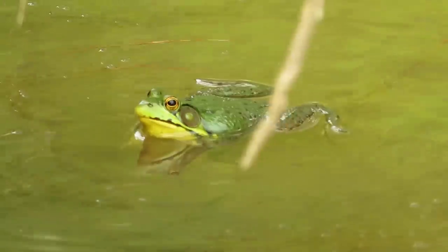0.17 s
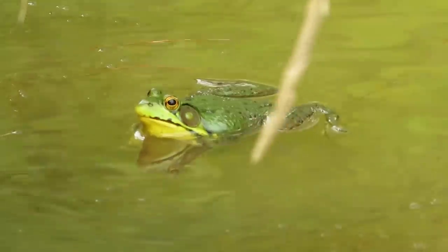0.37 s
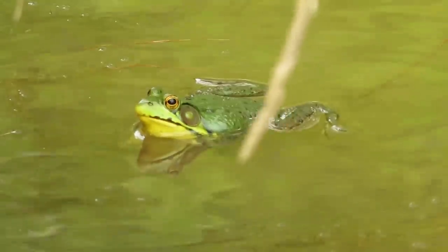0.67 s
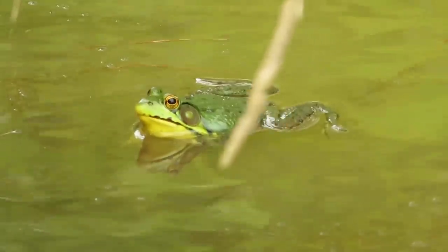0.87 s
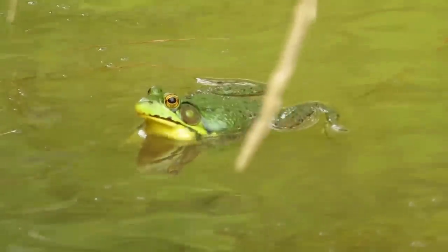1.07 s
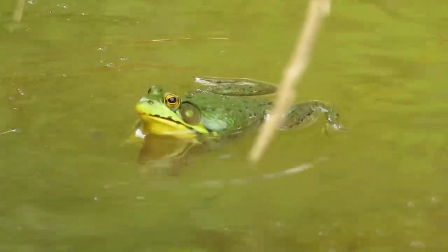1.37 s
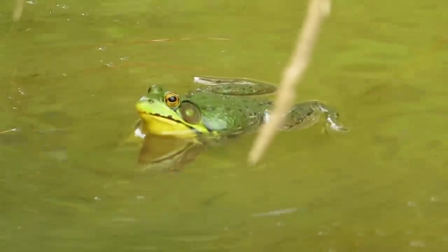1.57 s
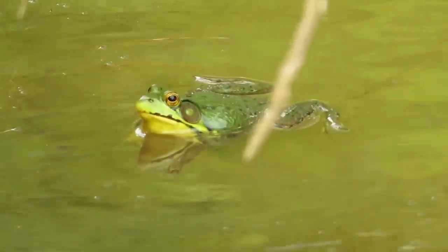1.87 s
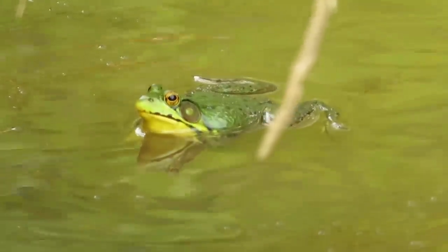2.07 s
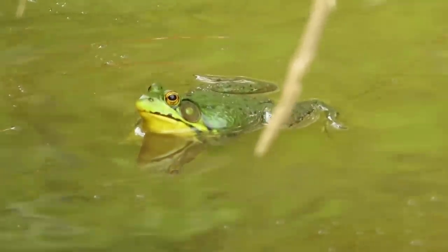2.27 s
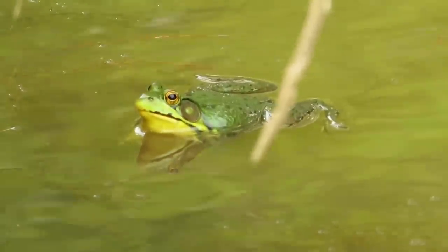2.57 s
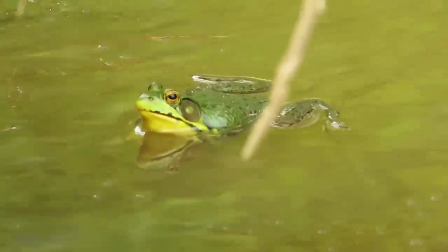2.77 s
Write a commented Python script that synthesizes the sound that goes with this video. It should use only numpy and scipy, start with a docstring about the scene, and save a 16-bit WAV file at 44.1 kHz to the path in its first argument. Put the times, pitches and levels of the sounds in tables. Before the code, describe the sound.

Single dull, abrupt frog gulp, barely above constant microphone and air hiss with uneven bass rumble and fine high sizzle, followed by one tiny, high, echoing bird-like peep far off across the pond.

```python
"""Steady hiss hangs over a quiet pond: shaped noise with a soft, very wide low rush whose bass swells and dips.
Narrow noise peaks between about 7.6 and 9.2 kHz add sizzle, and two weak, wandering sines add hum.
Halfway through, a green frog gives one faint, abrupt gulp: two pushes ring two throat resonances.
Later comes one thin, distant peep, probably a bird: a whistle scooping up into scattered echoes."""
import sys
import numpy as np
from scipy import signal
from scipy.fft import rfft, irfft
from scipy.io import wavfile

SR = 44100
rng = np.random.default_rng(int(sys.argv[2]) if len(sys.argv) > 2 else 0)


def bounce(signal):
    """Save signal as a 16-bit WAV file at the path given by the first command-line argument."""
    frames = np.transpose(np.atleast_2d(signal))
    limited = np.clip(frames, -1, 1)
    pcm = np.round(limited * 32767).astype(np.int16)
    wavfile.write(sys.argv[1], SR, pcm)


N = 128772


def undb(db):
    """Decibels to amplitude gain."""
    return 10 ** (np.asarray(db) / 20)


def level(x, db):
    """Scale to an rms level in dB."""
    return x * undb(db) / np.sqrt(np.mean(x ** 2))


def pan(x, db):
    """Make the left channel db louder than the right."""
    return x * undb(np.array([[db], [-db]]) / 2)


def shaped(x, gain):
    """Filter without phase shift by a gain that is a function of frequency."""
    f = np.arange(N // 2 + 1) * SR / N
    return irfft(rfft(x) * gain(f), N)


def noise(gain):
    """White noise shaped by a gain that is a function of frequency."""
    return shaped(rng.standard_normal(N), gain)


def coloured(points):
    """Noise whose spectrum joins (f/Hz, level/dB) points along a logarithmic frequency axis."""
    hz, db = np.array(points).T
    return noise(lambda f: undb(np.interp(np.log(f + 1), np.log(hz), db)))


def walk(rate):
    """Smooth random drift around zero with an rms of 1, its motion mostly slower than rate in Hz."""
    return level(noise(lambda f: np.exp(-(f / rate) ** 2) * (f > 0)), 0)


def bass_swell(mid, t):
    """Swells and dips of the centred noise below about 125 Hz; the wide part keeps its level."""
    # bass gain over time: t/s, level/dB
    bass_moves = [(.04, -7), (.28, 2.5), (.5, -1), (1.07, 2.2), (1.24, -1.5), (1.34, 2.5), (1.62, -.5),
                  (1.77, 2), (2.08, -0.5), (2.26, 2), (2.37, -4), (2.47, 4.5), (2.6, -3), (2.85, 2.5)]
    times, db = np.array(bass_moves).T
    bass = shaped(mid, lambda f: 1 / (1 + (f / 125) ** 4))
    return mid + bass * (undb(np.interp(t, times, db)) - 1)


def drifting_bands(air):
    """Let overlapping bands of the hiss flicker slightly, each on its own."""
    # band centres: f/Hz
    band_centres = [1200, 2400, 4000, 7500]
    drift_db, drift_hz = 0.43, 12  # rms depth, fastest motion
    for hz in band_centres:
        # bell-shaped on an octave scale
        band = shaped(air, lambda f: np.exp(-(2 * np.log2((f + 1) / hz)) ** 2))
        air = air + band * (undb(drift_db * walk(drift_hz)) - 1)
    return air


def leaning_treble(air, t):
    """Lean the treble to the right and let it grow very slowly."""
    highpass = signal.butter(1, 3000, "high", fs=SR, output="sos")
    treble = signal.sosfiltfilt(highpass, air)
    rise_db = 0.5 * (t - t.mean())  # half a dB per second
    return air - treble + pan(treble, -0.8) * undb(rise_db)


def hiss(t):
    """Steady air and microphone noise: equal (mid) plus opposed (side) noise, wide in the low middle."""
    # spectrum of the noise shared by both channels: f/Hz, relative level/dB
    mid_spectrum = [(14, -29), (27, -8), (45, -1.5), (120, -1.07), (200, -3), (285, -5), (370, -7),
                    (850, -9.5), (1500, -14), (2600, -16.5), (3700, -18), (4500, -20.5), (5200, -23),
                    (6300, -24), (7000, -27), (9200, -29), (9750, -37), (13500, -41), (15100, -50)]
    # spectrum of the noise opposed between the channels: f/Hz, relative level/dB
    side_spectrum = [(20, -36), (45, -19), (75, -9), (125, -1.5), (200, -1), (320, -1.5), (600, -7.5),
                     (1000, -13.5), (2000, -23), (3500, -28.5), (7000, -32.5), (9200, -39), (9650, -43),
                     (13500, -46), (15100, -45)]
    mid = level(coloured(mid_spectrum), -48)
    side = level(coloured(side_spectrum), -43)
    mid = bass_swell(mid, t)
    waver_db = 0.22 * walk(1.2)
    air = np.array([mid + side, mid - side]) * undb(waver_db)
    return leaning_treble(drifting_bands(air), t)


def sizzle():
    """Narrow high resonant peaks of noise, unrelated left and right and leaning right."""
    # noise peaks: f/Hz, width/Hz, rms level before panning/dB
    peaks = [(7615, 280, -66), (8010, 140, -69), (8480, 110, -76.5), (8600, 260, -73), (9210, 110, -75.5)]

    def peak(hz, width, db):
        return level(noise(lambda f: 1 / (1 + ((f - hz) / width * np.sqrt(2)) ** 2)), db)

    def channel():
        return sum(peak(hz, width, db) for hz, width, db in peaks)

    return pan(np.array([channel(), channel()]), -1)


def hum():
    """Two weak sines in the centre, each wandering in pitch on its own."""
    # tones: f/Hz, rms level/dB
    tones = [(120, -65), (978, -71.5)]
    out = np.zeros(N)
    for hz, db in tones:
        pitch = hz + 5.3 * walk(13.2)  # 5.3 Hz rms wander
        out += level(np.sin(2 * np.pi * np.cumsum(pitch) / SR), db)
    return out


def frog(t):
    """Two quick pushes of the vocal folds ring the throat, which dies away at once."""
    # pushes: t/s, drive level into the resonances/dB
    pushes = [(1.4612, -34), (1.4663, -35)]
    # throat resonances: f/Hz, level relative to the push/dB, time to fall by 60 dB/s
    throat = [(560, -3, 0.022), (408, -2, 0.021)]
    attack_s = .0015  # time constant
    out = np.zeros(N)
    for start, push_db in pushes:
        age = np.maximum(t - start, 0)
        ring = np.zeros(N)
        for hz, db, t60 in throat:
            ring += undb(db - 60 * age / t60) * np.sin(2 * np.pi * hz * age)
        onset = 1 - np.exp(-age / attack_s)
        out += undb(push_db) * ring * onset
    return out


def bank_echo(whistle, t):
    """Scattered echoes from the banks: the whistle smeared by decaying noise, separate left and right."""
    t60_s = .35
    banks = rng.standard_normal((2, N)) * np.exp(-np.log(1000) * t / t60_s)
    return np.array([signal.fftconvolve(whistle, bank / np.linalg.norm(bank))[:N] for bank in banks])


def bird(t):
    """One thin whistle that scoops up to its wobbling pitch and fades, blurred by echoes."""
    start_s, attack_s, decay_s = 2.19, .014, .03  # decay is a time constant
    pitch_hz, scoop_hz, scoop_s = 7240, 280, .014  # starts one scoop below the pitch
    age = np.maximum(t - start_s, 0)
    wobble = 40 * walk(80)  # 40 Hz rms
    hz = pitch_hz - scoop_hz * np.exp(-age / scoop_s) + wobble
    swell = np.minimum(age / attack_s, 1) * np.exp(-age / decay_s)
    whistle = undb(-56) * swell * np.sin(2 * np.pi * np.cumsum(hz) / SR)
    return pan(whistle, -4) + undb(-5) * bank_echo(whistle, t)


def scene():
    """Frog and bird inside the steady noise."""
    t = np.arange(N) / SR
    return hiss(t) + sizzle() + hum() + frog(t) + bird(t)


def record(dry):
    """The sound switches on just after the start; a steep low-pass cuts the top."""
    start_s, top_hz = .036, 15150
    running = np.arange(N) / SR >= start_s
    lowpass = signal.ellip(10, .1, 80, top_hz, fs=SR, output="sos")
    return signal.sosfilt(lowpass, dry * running)


dry = scene()
out = record(dry)
bounce(out)
```